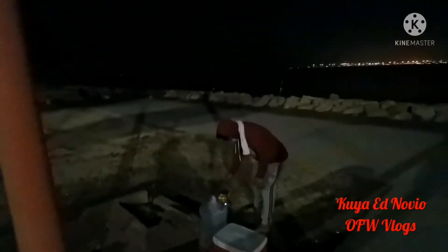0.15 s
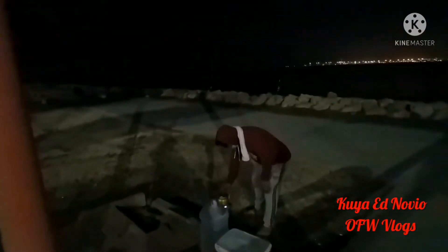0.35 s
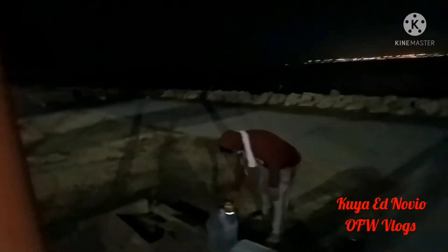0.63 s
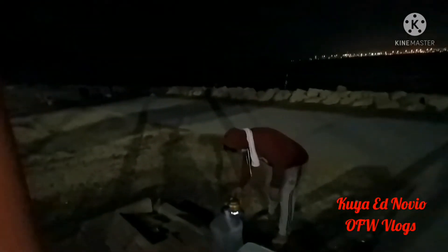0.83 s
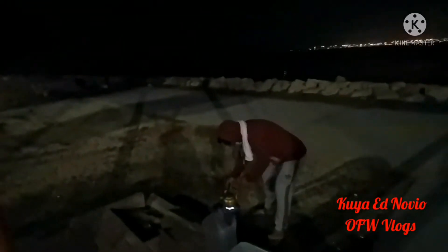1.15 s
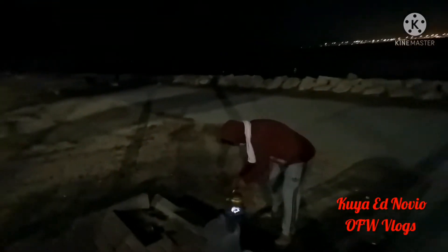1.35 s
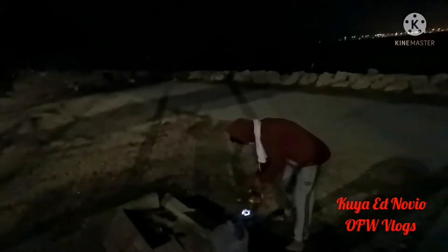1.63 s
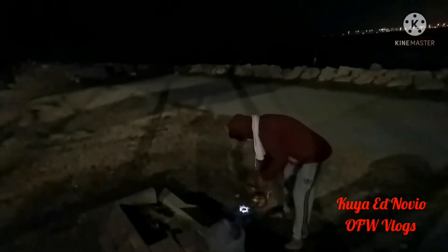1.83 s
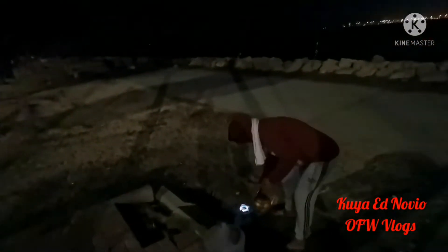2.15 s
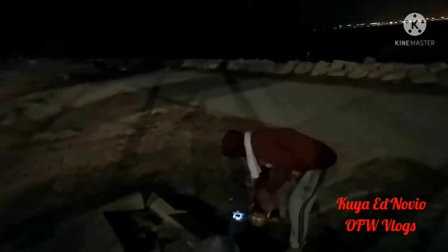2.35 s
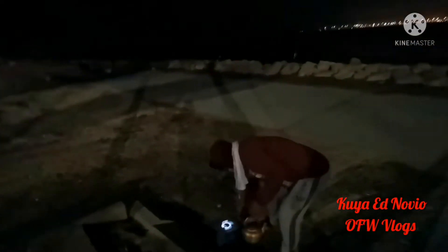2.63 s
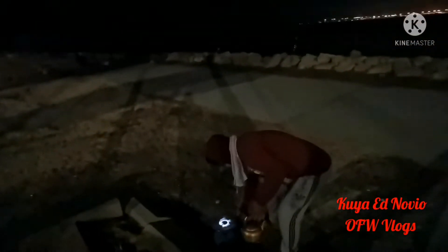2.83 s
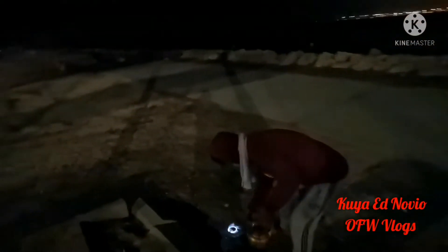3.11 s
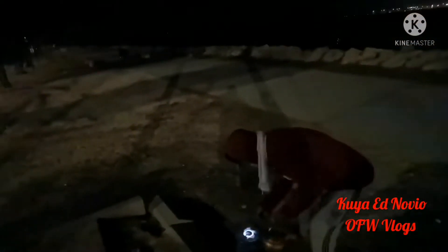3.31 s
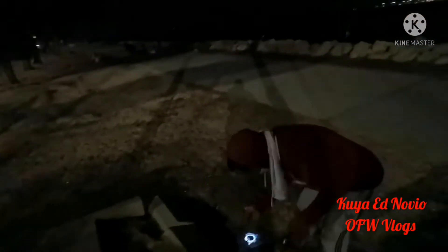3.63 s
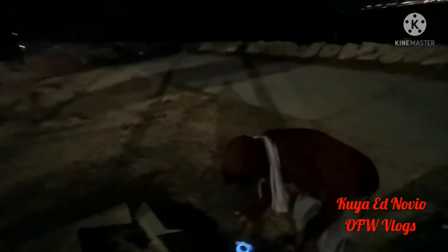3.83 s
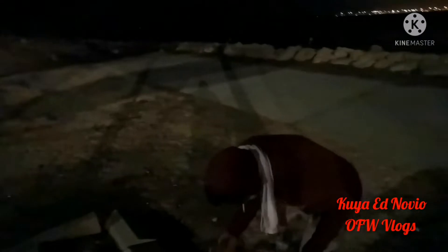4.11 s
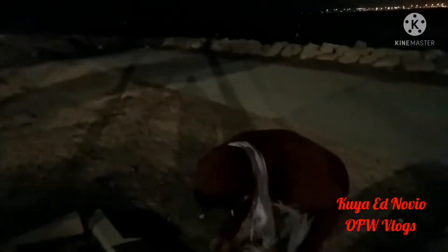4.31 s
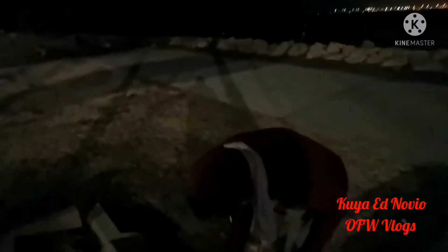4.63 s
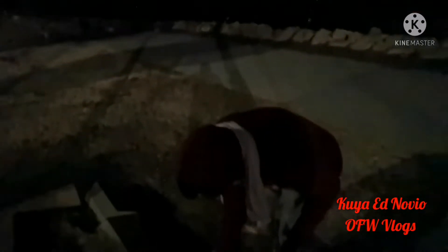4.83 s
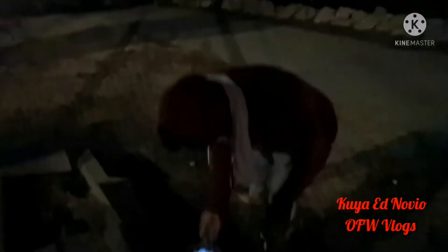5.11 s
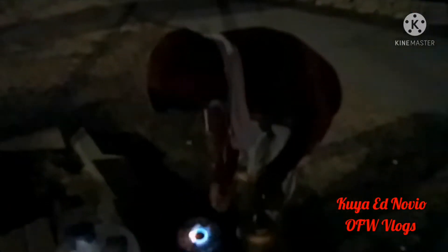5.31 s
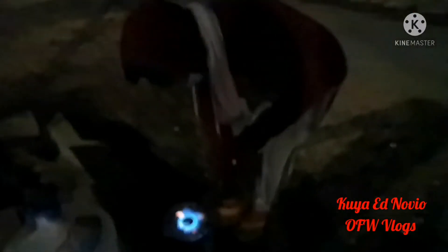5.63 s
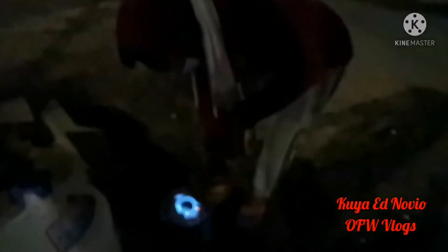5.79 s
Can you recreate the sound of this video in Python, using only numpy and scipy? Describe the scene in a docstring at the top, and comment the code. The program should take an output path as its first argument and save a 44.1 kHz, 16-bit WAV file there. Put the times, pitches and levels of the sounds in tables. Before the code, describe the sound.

A gas flame burns unsteadily on open ground: deep rumbling flares, a wavering low hum, airy roar and a bright jet hiss with wandering whistle. The moving stereo microphone draws closer, so everything gets louder and brighter. One tiny squeak comes early, light metal knocks and gritty scuffs later, and a single hard metallic clack stands out after the middle.

```python
"""On open ground at night, a portable gas burner runs while a metal kettle is handled beside it.
The flame rumbles, hums, roars and flares: shaped noise plus one wavering note.
The gas jet hisses, whistles and spurts: noise, some of it in moving resonances; flame and jet grow as the mic nears.
Metal clacks once, sharply, as dying ringing tones, among faint ticks, scuffs and one squeak.
Loud sound turns the recorder's gain down for about half a second."""
import sys
import numpy as np
from scipy import signal
from scipy.io import wavfile
from scipy.ndimage import uniform_filter1d, minimum_filter1d, map_coordinates

SR = 44100
rng = np.random.default_rng(int(sys.argv[2]) if len(sys.argv) > 2 else 0)


def master_out(mix):
    """Clip the mix to full scale and print it as 16-bit PCM to the path in sys.argv[1]."""
    frames = np.transpose(np.atleast_2d(mix))
    ceiling = np.clip(frames, -1, 1)
    pcm = np.round(ceiling * 32767).astype(np.int16)
    wavfile.write(sys.argv[1], SR, pcm)


N = 262911  # length in samples, about 6 s
T = np.arange(N) / SR  # time of each sample, in seconds


def from_db(db):
    """Decibels to a plain gain."""
    return 10 ** (np.asarray(db) / 20)


def rms_one(x):
    """Scale a sound to an average (rms) strength of 1."""
    return x / np.sqrt(np.mean(np.abs(x) ** 2) + 1e-20)


def in_time(rows):
    """Read each column of a time table, sample by sample."""
    s, *columns = np.transpose(rows)
    return [np.interp(T, s, column) for column in columns]


def at_hz(points, hz):
    """Read a frequency table on a log-frequency axis."""
    table_hz, values = np.transpose(points)
    return np.interp(np.log(hz), np.log(table_hz), values)


def drift(rate):
    """A random wander of spread 1 that heads for a new value `rate` times a second."""
    return np.interp(T * rate, np.arange(2000), rng.standard_normal(2000)) * np.sqrt(3 / 2)


# How alike left and right are: pitch_hz, correlation (1 = identical)
LIKENESS = [(40, 0.34), (130, 0.78), (400, 0.92), (800, 0.7), (1500, 0.19), (3000, 0.24), (6000, 0.26),
            (15000, 0.58)]
# Which side is louder: pitch_hz, left_minus_right_db
SIDE_LEAN = [(60, -1), (300, -0.5), (700, 1), (1100, 3.5), (1800, 4), (2700, -1), (4000, 0), (5500, 3.5),
             (8000, -3.5), (15000, -0.5)]


def to_stereo(mid, side, hz):
    """Mix two unrelated noises into left and right, with the likeness and lean of their pitch."""
    alike = np.clip(at_hz(LIKENESS, hz), -1, 1)
    sign = np.array([[1], [-1]])
    pair = np.sqrt(1 + alike) * mid + np.sqrt(1 - alike) * side * sign
    return pair * from_db(sign * at_hz(SIDE_LEAN, hz) / 2)


def coloured_noise(spectrum, flicker_db=None):
    """Stereo noise in bands about a third of an octave wide, each able to flicker by itself; rms 1."""
    low, high = max(spectrum[0][0], 15), min(spectrum[-1][0], SR * .45)
    edges = np.geomspace(low, high, int(3 * np.log2(high / low)) + 4)
    white, out = rng.standard_normal((2, 2, N)), 0
    for k, band in enumerate(zip(edges, edges[1:])):
        band_filter = signal.butter(2, band, "band", fs=SR, output="sos")
        mid, side = signal.sosfilt(band_filter, white[k % 2])  # neighbouring bands use unrelated noise
        hz = np.sqrt(band[0] * band[1])
        flicker = flicker_db * drift(25) if flicker_db else 0
        out = out + to_stereo(mid, side, hz) * from_db(at_hz(spectrum, hz) + flicker)
    return rms_one(out)


def resonant_noise(centre_hz, width_hz):
    """Turbulence in a resonance whose centre and width may move; rms 1."""
    white = rng.standard_normal((2, N // 4)) + 1j * rng.standard_normal((2, N // 4))
    swirl = signal.sosfilt(signal.butter(2, 1 / 16, output="sos"), white)
    # the wider the resonance, the faster the slow noise is read
    clock = 16 * np.cumsum(width_hz * np.ones(N)) / SR + 100
    narrow = np.array([np.interp(clock, np.arange(N // 4), row) for row in swirl])
    carrier = np.exp(2j * np.pi * np.cumsum(centre_hz) / SR)
    mid, side = np.real(narrow * carrier)
    return rms_one(to_stereo(mid, side, np.mean(centre_hz)))


def burst(start, rise, length):
    """An envelope that swells quickly and dies exponentially (times in seconds)."""
    age = np.maximum(T - start, 0)
    return (1 - np.exp(-age / rise)) * np.exp(-age / length)


def swell(s, length):
    """A smooth bell-shaped rise and fall around a moment; height 1."""
    return np.exp(-np.minimum((2 * (T - s) / length) ** 2 / 2, 20))


def together(*gains):
    """Unrelated sounds add in power."""
    return np.sqrt(sum(gain ** 2 for gain in gains))


# How the burner grows as the microphone comes closer: time_s, nearness_db
NEARNESS = [(0, -7), (1.2, -4), (1.9, -4.5), (2.3, -4.5), (3.1, -0.5), (3.8, 0.5), (4.25, 6.5), (4.9, 3),
            (5.3, 8), (5.55, 6), (5.96, 9)]


def steady(level_db, follows):
    """The gain of a layer: its level at nearness 0 dB, and the dB it gains per dB of nearness."""
    near_db, = in_time(NEARNESS)
    return from_db(level_db + follows * near_db)


# First peak of the ground echo along the microphone's path: time_s, peak_hz
ECHO_PEAK = [(0, 910), (0.6, 1230), (1.2, 1200), (1.7, 1004), (2.2, 1010), (2.4, 630), (2.85, 817),
             (3.8, 987), (4.3, 640), (5.6, 720), (5.96, 1490)]


def ground_echo(x, share):
    """The ground bounce, about a millisecond late, combs the sound as the microphone moves; rms 1."""
    peak_hz, = in_time(ECHO_PEAK)
    echo = np.array([np.interp(T - 1 / peak_hz, T, side) for side in x])
    return rms_one(x + share * echo)


def near_echo(x):
    """Things beside the burner reflect sound a few milliseconds late, leaving fine, shifting peaks."""
    share = .3
    late_s = .0045 + .0002 * drift(3)
    echo = np.array([map_coordinates(side, [(T - late_s) * SR], order=3, mode="nearest") for side in x])
    return (x + share * echo) / np.sqrt(1 + share ** 2)


# Where the burner lies: time_s, extra_left_minus_right_db, left_delay_ms
BEARING = [(0, 1.5, 0.023), (1.2, 1.7, 0.035), (3.2, 0.5, 0.072), (4.1, 1.5, 0.042), (4.8, 0.5, -0.0059),
           (5.96, 2, -0.047)]


def placed(x):
    """As the microphone turns, sound shifts a little in level and arrival time between the sides."""
    lean_db, delay_ms = in_time(BEARING)
    left = map_coordinates(x[0], [np.arange(N) - delay_ms * SR / 1000], order=3, mode="nearest")
    return np.array([left * from_db(lean_db / 2), x[1] * from_db(-lean_db / 2)])


# Draughts make the flame flare: peak_s, length_s, rumble_db, flutter_db
FLARES = [(0.82, 0.58, -55, -44), (1.687, 0.49, -44.5, -44.5), (2.358, 1, -63, -47),
          (2.812, 0.16, -43.5, -58), (3.21, 0.29, -35, -48.5), (3.577, 0.42, -40, -43.5),
          (3.995, 0.16, -40, -41), (4.963, 0.3, -66, -46.5), (5.423, 0.18, -62, -37),
          (5.63, 0.36, -40.5, -42)]
# Colour of the deep rumble: pitch_hz, relative_db_per_hz
RUMBLE = [(28, -26), (42, -8.5), (60, -11.5), (75, -5), (92, -0.5), (115, 6), (135, 0), (170, -26)]


def rumble():
    """Unsteady burning makes a deep noise that swells in each flare."""
    flares = [from_db(db) * swell(s, length) for s, length, db, _ in FLARES]
    gain = together(steady(level_db=-48.5, follows=0.024), *flares)
    return gain * from_db(1.1 * drift(22.02)) * coloured_noise(RUMBLE)


def hum():
    """The low note at which the flame drones, wavering in pitch and level; rms about 1."""
    hz = 172.7 + 2.5 * drift(14)
    waver_db = 2.5 * drift(12)
    return from_db(waver_db) * rms_one(np.sin(2 * np.pi * np.cumsum(hz) / SR))


# Colour of the flutter: pitch_hz, relative_db_per_hz
FLUTTER = [(120, -9), (145, -0.5), (180, 5), (220, 0.5), (270, -3.5), (330, -14.5), (420, -12.5)]


def flutter():
    """Low noise and the hum swell together in each flare."""
    flares = [from_db(db) * swell(s, length) for s, length, _, db in FLARES]
    gain = together(steady(level_db=-48, follows=0.46), *flares)
    return gain * (from_db(-2.97) * coloured_noise(FLUTTER) + from_db(-5) * hum())


# Colour of the roar: pitch_hz, relative_db_per_hz
ROAR = [(250, 5.5), (350, -5.5), (500, 2.5), (800, -5), (1100, -4), (1500, -13), (2200, -46)]
# Loudness of the roar: time_s, level_db
ROAR_LEVEL = [(0, -57), (1.5, -51), (2.4, -52), (2.7, -52.5), (3.35, -45.5), (3.85, -47.5), (4.0, -55.5),
              (4.3, -44.5), (5.2, -45.5), (5.5, -37.5), (5.7, -43), (5.85, -50.5)]


def roar():
    """Flickering middle-pitched noise from the flame, combed by the ground echo."""
    level_db, = in_time(ROAR_LEVEL)
    return from_db(level_db) * ground_echo(coloured_noise(ROAR, flicker_db=2.5), share=.55)


# Colour of the rush: pitch_hz, relative_db_per_hz
RUSH = [(900, -39), (1350, -1), (1800, 2), (2300, -3), (2900, -4), (3800, -2), (5000, -44)]


def rush(spray_gain):
    """Airy noise above the roar blends from dull to bright as it gets louder."""
    bright = coloured_noise(RUSH, flicker_db=2.0)
    treble_cut = signal.butter(3, 2000, fs=SR, output="sos")
    dull = rms_one(signal.sosfilt(treble_cut, coloured_noise(RUSH)))
    gain = together(steady(level_db=-55, follows=1.3), from_db(-3) * spray_gain)
    brightness = np.clip((20 * np.log10(gain) + 62.0) / 11, 0, 1)
    return near_echo(gain * (np.sqrt(brightness) * bright + np.sqrt(1 - brightness) * dull))


def flame(spray_gain):
    """Unsteady burning rumbles, flutters and hums, with a roar and a rush above."""
    return rumble() + flutter() + roar() + rush(spray_gain)


# Colour of the hiss: pitch_hz, relative_db_per_hz
HISS = [(3100, 3), (3500, 10), (3900, 9), (4500, 7), (5300, 5), (6300, -41), (7300, -35), (9000, -13)]


def hiss(spray_gain):
    """Escaping gas makes broad, flickering noise, stronger in each spurt."""
    low_cut = signal.butter(6, 3200, "high", fs=SR, output="sos")
    noise = signal.sosfilt(low_cut, coloured_noise(HISS, flicker_db=1.8))
    gain = together(steady(level_db=-56, follows=0.8), from_db(3.5) * spray_gain)
    return gain * ground_echo(noise, share=0.27)


# The hiss holds one resonance for a while: start_s, end_s, pitch_hz, level_db, width_hz
HELD_TONES = [(0, 1.352, 4370, -59, 420.1), (1.85, 2.352, 3640, -59.5, 398.8),
              (2.362, 2.47, 4737, -50.5, 801), (2.471, 2.56, 5110, -50, 601.7),
              (2.62, 2.83, 4420, -53, 550), (2.83, 3.154, 4270, -51, 381), (3.131, 4.05, 4292, -47, 383.6),
              (4.503, 4.775, 3500, -49.5, 317.4), (5.43, 5.6, 3837, -44.5, 259.3),
              (5.87, 6.05, 5300, -40, 449)]
HELD_FADE_S = 0.11


def held_tones():
    """A burner resonance fades in, stays near its pitch and fades out; in an overlap the stronger leads."""
    gains = []
    for start, end, _, db, _ in HELD_TONES:
        fade = .5 + np.minimum(T - start, end - T) / HELD_FADE_S
        gains.append(from_db(db) * np.clip(fade, 1e-6, 1))
    gain = together(*gains)
    power_shares = (np.array(gains) / gain) ** 2
    _, _, hz, _, width_hz = np.transpose(HELD_TONES) @ power_shares
    return gain * resonant_noise(hz + 40 * drift(18), width_hz)


# Colour of the sizzle: pitch_hz, relative_db_per_hz
SIZZLE = [(6000, 18), (7400, 7.5), (8600, -9), (9800, -2), (11300, 5.5), (13000, 16.5), (16000, 11)]


def sizzle(spray_gain):
    """Fine high noise flickers on top of the jet."""
    gain = together(steady(level_db=-63.5, follows=1.46), spray_gain) * from_db(0.46 * drift(45))
    return gain * coloured_noise(SIZZLE, flicker_db=2.4)


# The jet's whistle, barely there at first: time_s, pitch_hz, level_db
WHISTLE = [(1.2, 5600, -74), (1.8, 5670, -65), (2.21, 5470, -60), (2.42, 6060, -48), (2.66, 6140, -61),
           (2.72, 6330, -41), (2.84, 5950, -50), (2.9, 6100, -46), (2.99, 5610, -55.5), (3.2, 6120, -54),
           (3.27, 5800, -42), (3.35, 5620, -62), (3.48, 5700, -56), (3.62, 5800, -45), (3.72, 5600, -49.5),
           (3.96, 5650, -47.5), (4.02, 6150, -36), (4.11, 5780, -31.5), (4.19, 5620, -49),
           (4.286, 5780, -41.5), (4.58, 5640, -48), (4.634, 5810, -61), (4.67, 6050, -47.5),
           (4.816, 5860, -41.5), (4.928, 5750, -44), (5.25, 5860, -47.5), (5.424, 5360, -43),
           (5.524, 5900, -50.5), (5.64, 6160, -40), (5.72, 6150, -63), (5.8, 6350, -34.5),
           (5.87, 6200, -42.5), (5.96, 6250, -62)]
# The whistle leans right, then left, then right again: time_s, left_minus_right_db
WHISTLE_LEAN = [(0, -3), (3.2, 0), (4.1, 1), (4.4, 2.5), (5.0, 4), (5.5, 2), (5.96, -6)]


def whistle(spray_gain):
    """The jet's breathy whistle jitters in pitch; spurts wake a second one just above."""
    hz, db = in_time(WHISTLE)
    lean_db, = in_time(WHISTLE_LEAN)
    scatter_hz = 70
    main = resonant_noise(hz + scatter_hz * drift(55), width_hz=430)
    main = from_db(db + 2 * drift(25)) * main
    upper = resonant_noise(1.1 * hz + scatter_hz * drift(30), width_hz=420)
    upper = from_db(-5) * spray_gain * upper
    return (main + upper) * from_db(lean_db * np.array([[.5], [-.5]]))


# The jet spurts: peak_s, length_s, level_db (before each layer takes its share)
SPURTS = [(1.312, 0.066, -64), (2.47, 0.22, -61), (2.736, 0.16, -62), (3.15, 0.057, -54.5),
          (3.593, 0.24, -54), (3.93, 0.15, -47.5), (4.025, 0.069, -43.5), (4.087, 0.1, -42),
          (4.3, 0.048, -56), (4.376, 0.045, -53), (4.787, 0.22, -50.5), (5.085, 0.25, -52.5),
          (5.22, 0.076, -54), (5.642, 0.13, -52), (5.83, 0.31, -44.5)]


def spray():
    """The gain of the broad hiss that the spurts throw out."""
    return together(*(from_db(db) * swell(s, length) for s, length, db in SPURTS))


def gas_jet(spray_gain):
    """Escaping gas hisses with held resonances and a wandering whistle, under a fine sizzle."""
    return near_echo(hiss(spray_gain) + held_tones() + whistle(spray_gain)) + sizzle(spray_gain)


def squeak():
    """One faint, short, unsteady note with a strong octave."""
    phase = 2 * np.pi * np.cumsum(1920 + 14 * drift(150)) / SR  # pitch in Hz
    envelope = np.exp(-((T - 1.118) / .016) ** 2)
    return from_db(-56) * envelope * (np.sin(phase) + from_db(4) * np.sin(2 * phase))


# Colour of a scuff: pitch_hz, relative_db_per_hz
SCUFF = [(700, -31), (1800, 10), (3500, -23), (6000, 12.5), (8000, -7), (11000, 8.5), (15500, -40)]
# Small handling sounds: start_s, level_db, length_s, dull_above_hz
SCUFFS = [(2.285, -48, 0.013, 8930), (3.062, -47, 0.052, 12000), (3.12, -48, 0.023, 13900),
          (4.707, -38.5, 0.085, 10830), (4.99, -45, 0.077, 13930), (5.782, -39.5, 0.047, 11850)]


def handling():
    """Brief scuffs are bursts of grainy noise, each dulled above its own pitch."""
    grains_db = 4.5 * drift(450)
    grit, out = rms_one(coloured_noise(SCUFF) * from_db(grains_db)), 0
    for s, db, length, dull_hz in SCUFFS:
        treble_cut = signal.butter(2, min(dull_hz, SR / 2 - 1000), fs=SR, output="sos")
        scuff = grit * burst(s, rise=length / 5, length=length)
        out = out + from_db(db) * signal.sosfilt(treble_cut, scuff)
    return out


def ring(force, hz, t60):
    """One ringing tone, as a rotating arrow that shrinks by 60 dB in t60 seconds."""
    pole = from_db(-60 / (t60 * SR)) * np.exp(2j * np.pi * hz / SR)
    return signal.lfilter([1], [1, -pole], force)


# Ringing tones of the metal, short and long: pitch_hz, relative_db, fade_60_db_s
METAL = [(1045, -30.5, 0.025), (1235, -23.8, 0.025), (1338, -23.8, 0.14), (1490, -31.4, 0.07),
         (1600, -27.2, 0.17), (1637, -35, 0.36), (1672, -22.8, 0.06), (1745, -28.9, 0.15),
         (1925, -29.5, 0.07), (2085, -28.6, 0.12), (2230, -30.9, 0.16), (2490, -29.6, 0.07),
         (2643, -36, 0.48), (3380, -33, 0.06), (3490, -27.9, 0.06), (3920, -28.4, 0.04),
         (4050, -32.0, 0.14), (4230, -25.3, 0.045), (4520, -28.4, 0.08), (4600, -25.1, 0.05),
         (4700, -33, 0.3), (4912, -20.7, 0.055), (5015, -34, 0.25), (5055, -24.5, 0.05),
         (5203, -21.1, 0.09), (5330, -21.2, 0.055), (5518, -28.3, 0.15), (5577, -35, 0.45),
         (5740, -25.9, 0.07), (5895, -22.8, 0.05), (6150, -29.0, 0.04), (6555, -31, 0.06),
         (6830, -31.5, 0.05), (7680, -29.3, 0.03)]


def metal(contact, start):
    """A gritty contact rings the metal's tones in alternating sense, each with its own phase per side."""
    span = slice(int(start * SR), int(start * SR) + SR // 2)
    side = np.array([[.5], [-.5]])
    force, out = (contact * rng.standard_normal(N))[span], np.zeros((2, N))
    for k, (hz, db, t60) in enumerate(METAL):
        mode = ring(force, hz, t60)
        # set its energy to that of an rms of 1 lasting 0.01 s
        mode = (-1) ** k * mode * np.sqrt(2 * .01 * SR / np.sum(np.abs(mode) ** 2))
        turn = np.exp(1j * side * rng.normal(0, 0.5))  # phase spread in radians
        out[:, span] += from_db(db + side * at_hz(SIDE_LEAN, hz)) * np.imag(mode * turn)
    return out


# Light knocks on the metal: start_s, level_db, loudest_near_hz, length_s
TICKS = [(3.083, -41, 1400, .005), (3.355, -36.5, 2500, .0028), (3.357, -40, 900, .004),
         (4.721, -37.5, 2500, .006), (4.747, -41.5, 2100, .008), (5.147, -39.5, 2000, .005),
         (5.275, -38.5, 1900, .007), (5.296, -36, 1900, .006)]


def ticks():
    """Light knocks: a short, gritty contact with a trace of the metal's ring."""
    grit, out = coloured_noise([(700, 2), (4000, -10), (15000, 12)]), 0
    for s, db, hz, length in TICKS:
        contact = burst(s, rise=length / 4, length=length)
        rung = metal(contact, s)
        knock = contact * grit + from_db(-13) * rung / np.abs(rung).max()
        colour = signal.butter(2, [hz / 1.7, hz * 1.4], "band", fs=SR, output="sos")
        knock = signal.sosfilt(colour, knock)
        out = out + from_db(db) * knock * np.sqrt(2 * length * SR / np.sum(knock ** 2))
    return out


# The clack's contacts, a touch, the blow and its chatter: start_s, relative_db
CLACK = [(4.1298, -18), (4.1319, -6), (4.1339, -10), (4.1359, -10.5), (4.1452, -23), (4.1552, -27)]
# Colour of the contacts: pitch_hz, relative_db_per_hz
CRACK = [(250, 2), (600, -23), (900, -9.5), (1200, 6), (1700, -7), (2500, -10), (3000, -31), (3900, -3),
         (5200, 10), (6200, -14), (7300, -6), (9800, -12.5), (13500, -2), (16000, -11)]
# Colour of the scattered tail: pitch_hz, relative_db_per_hz
CLACK_TAIL = [(500, -21), (1000, 1), (1400, 6), (2000, 9), (2700, -17), (3000, -6), (4200, -3), (5400, 3),
              (7000, -17), (9000, -21), (15000, -16)]


def clack():
    """Metal meets metal: contacts crack and ring it, and the surroundings scatter a short tail."""
    blow_s = CLACK[1][0]
    contact = sum(from_db(db) * burst(s, rise=.0004, length=.0019) for s, db in CLACK)
    scatter = from_db(-21) * burst(blow_s, rise=0.0026, length=.011)
    crack = from_db(-3) * (contact + scatter) * coloured_noise(CRACK)
    ringing = from_db(-0.5) * metal(contact, CLACK[0][0])
    tail = from_db(-22.5) * burst(blow_s, rise=0.0036, length=0.038) * coloured_noise(CLACK_TAIL)
    thin = signal.butter(4, 850, "high", fs=SR, output="sos")  # small metal parts ring without bass
    return crack + signal.sosfilt(thin, ringing + tail)


DUCK_ABOVE_DB, DUCK_MOST_DB = -26, 4.5
DUCK_ATTACK_S, DUCK_HOLD_S, DUCK_RELEASE_DB_PER_S = 0.067, 0.46, 42


def gain_control(x):
    """A loud sound turns the gain down; it stays down for a moment, then recovers."""
    power = uniform_filter1d(np.mean(x ** 2, axis=0), size=256)
    level_db = 10 * np.log10(np.abs(power) + 1e-12)
    over_db = np.clip(level_db - DUCK_ABOVE_DB, 0, DUCK_MOST_DB)
    # hold the largest recent excess, then let it fall at a steady rate
    hold = int(DUCK_HOLD_S * SR / 2)
    held_db = -minimum_filter1d(-over_db, 2 * hold + 1, origin=hold, mode="constant")
    fall_db = DUCK_RELEASE_DB_PER_S * T
    duck_db = np.maximum.accumulate(held_db + fall_db) - fall_db
    keep = np.exp(-1 / (DUCK_ATTACK_S * SR))
    return x * from_db(-signal.lfilter([1 - keep], [1, -keep], duck_db))


def scene():
    """Burner and handling in the open air."""
    spray_gain = spray()
    burner = flame(spray_gain) + gas_jet(spray_gain)
    return placed(burner + squeak() + handling() + ticks()) + clack()


def record(dry):
    """The deepest bass drops away, the gain ducks after loud sounds, peaks are rounded, the top is cut."""
    bass_cut = signal.butter(3, 32, "high", fs=SR, output="sos")
    rounded = np.tanh(gain_control(signal.sosfilt(bass_cut, dry)))
    top_cut = signal.ellip(12, .1, 80, 16000, fs=SR, output="sos")
    return signal.sosfilt(top_cut, rounded)


dry = scene()
out = record(dry)
master_out(out)
```